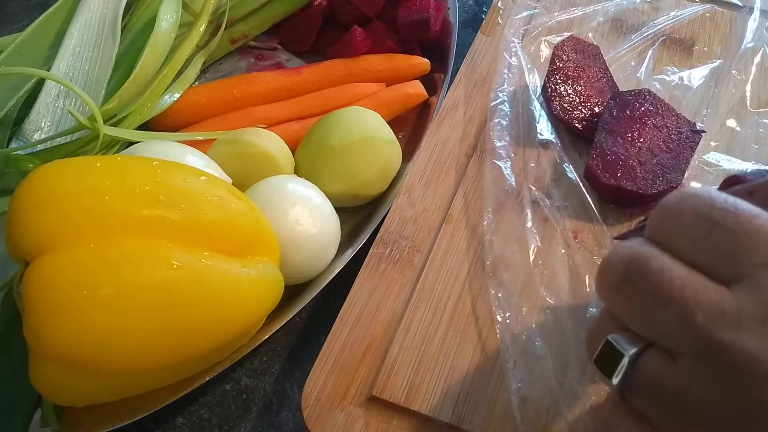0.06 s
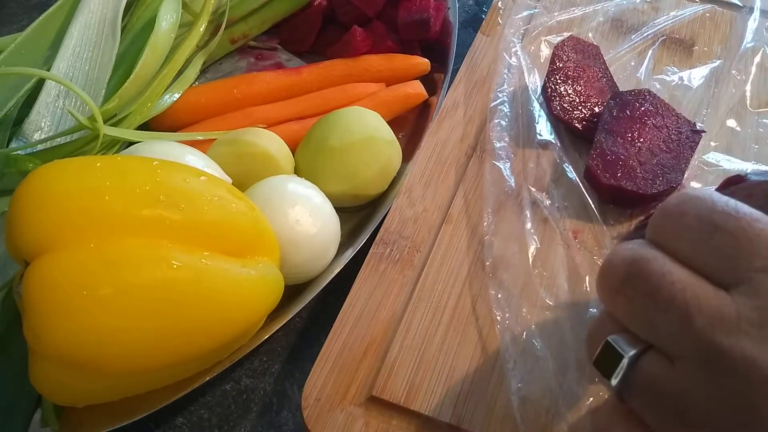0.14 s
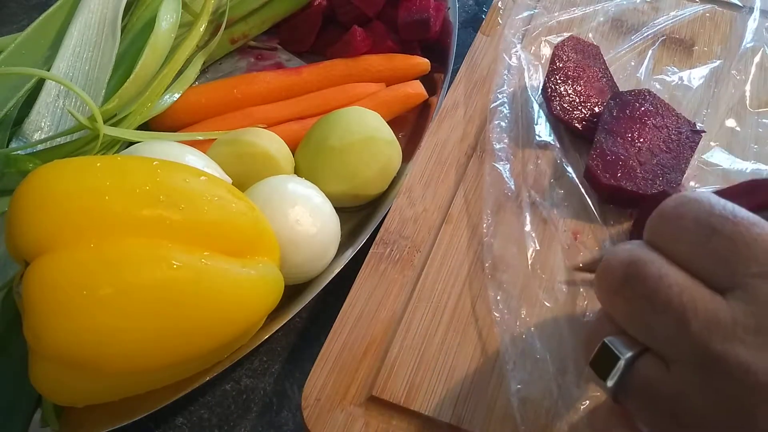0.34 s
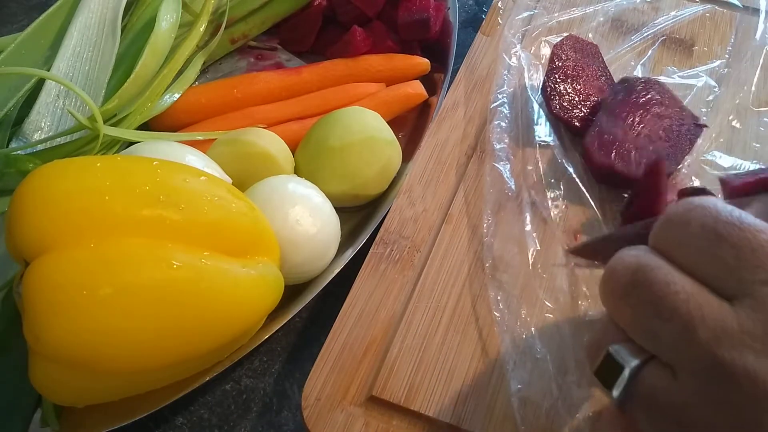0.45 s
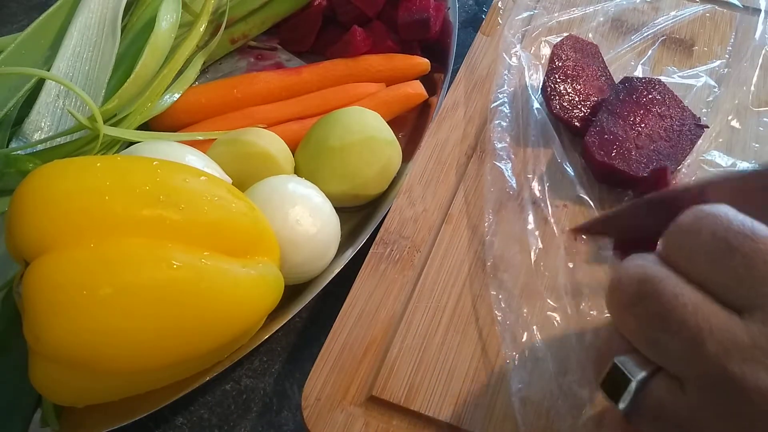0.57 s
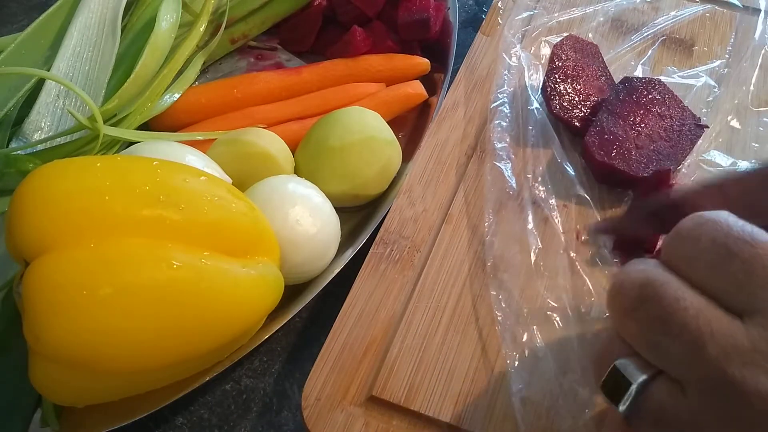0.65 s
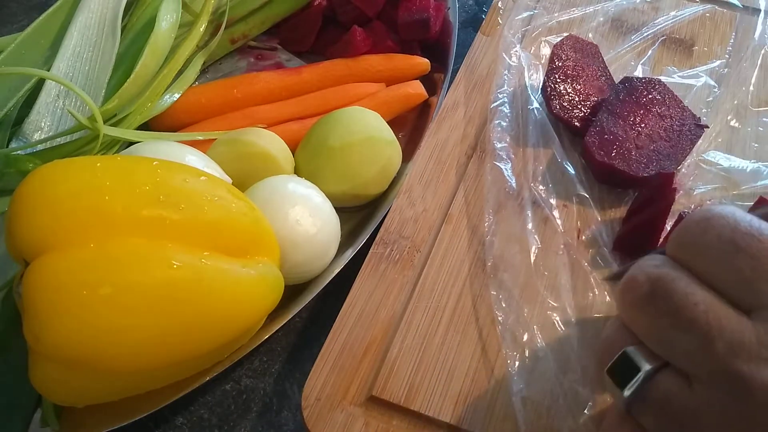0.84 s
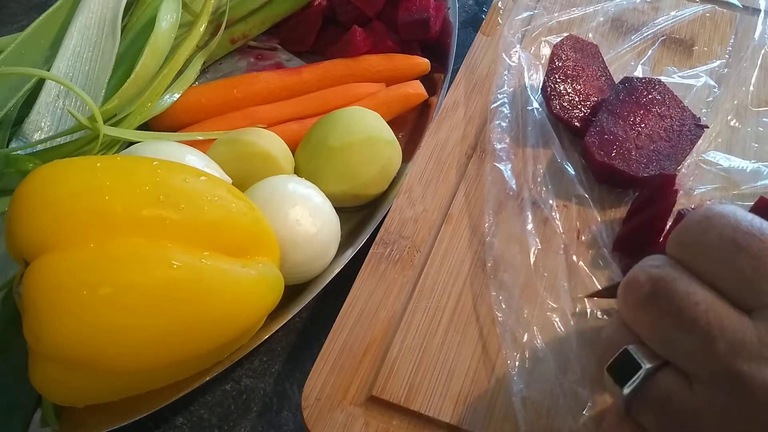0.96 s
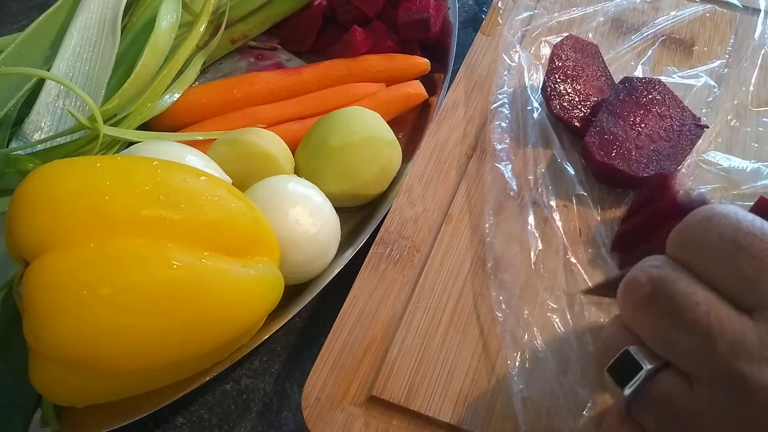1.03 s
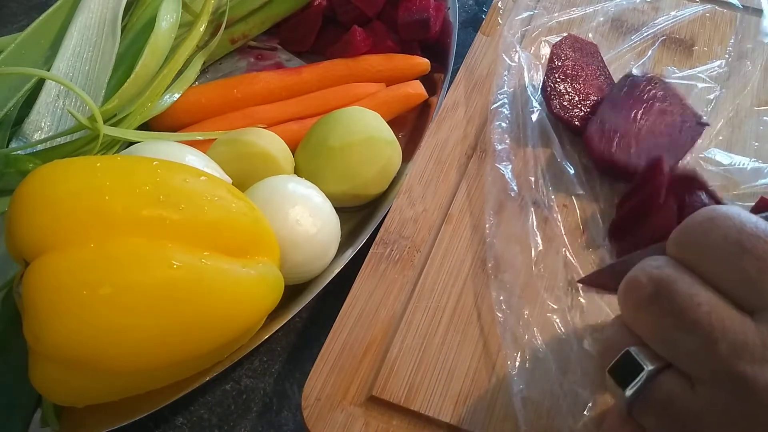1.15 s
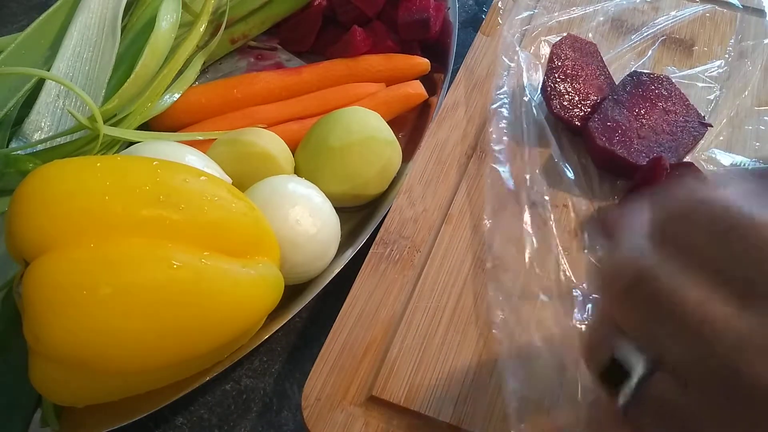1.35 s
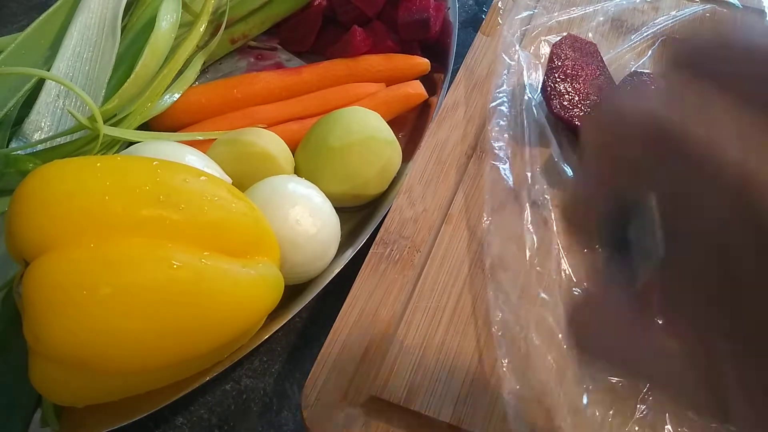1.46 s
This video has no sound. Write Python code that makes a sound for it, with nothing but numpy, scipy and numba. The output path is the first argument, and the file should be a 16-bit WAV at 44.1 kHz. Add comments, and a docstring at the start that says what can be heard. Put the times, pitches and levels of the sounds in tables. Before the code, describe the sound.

Close stereo pickup in a small kitchen: plastic film creases faintly, a blade squeaks and crunches through firm beetroot and raps the wooden board, pauses, then slices quietly and knocks again, with light rustles afterwards.

```python
"""Faint room air, creasing plastic film and soft rubs open the scene, then a kitchen knife cuts twice
through raw beetroot on a film-covered wooden board. The blade sticks, slips and creaks (decaying tones),
the flesh tears in crackling jerks (filtered random grains), and the blade knocks on the wood (force pulses
into ringing modes). The film rustles (grains), the hand nudges the board (resonant noise), and a small
kitchen rings briefly (convolution with decaying noise)."""
import sys
import numpy as np
from scipy import signal
from scipy.fft import rfft, irfft
from scipy.io import wavfile
from scipy.ndimage import uniform_filter1d
from numba import njit

SR = 44100
rng = np.random.default_rng(int(sys.argv[2]) if len(sys.argv) > 2 else 0)


def wrap_up_sound(samples):
    """Save the sound to the file named by the first command line argument, as 16-bit audio."""
    columns = np.atleast_2d(samples).T
    # keep every value between -1 and 1, then stretch to whole-number steps
    tamed = np.clip(columns, -1, 1)
    steps = np.round(tamed * 32767).astype(np.int16)
    wavfile.write(sys.argv[1], SR, steps)


N = 66150


def undb(db):
    """Amplitude ratio of a level in decibels."""
    return 10 ** (np.asarray(db) / 20)


def seconds():
    """Time axis [s]."""
    return np.arange(N) / SR


def unit(x):
    """Normalization to an rms of 1."""
    return x / np.sqrt(np.mean(x ** 2))


def ring(x, response):
    """Linear system: excitation convolved with impulse response."""
    return signal.fftconvolve(x, response)[:N]


def colour(points):
    """Minimum-phase impulse response of a spectrum (frequency [Hz], level [dB]), by folding the cepstrum."""
    hz, db = np.array(points, float).T
    size = 8192
    bins = np.fft.rfftfreq(size, 1 / SR)
    gain = undb(np.interp(np.log(bins + 1), np.log(hz), db))
    cepstrum = irfft(np.log(gain))
    cepstrum[1:size // 2] *= 2
    cepstrum[size // 2 + 1:] = 0
    return irfft(np.exp(rfft(cepstrum)))


def through(x, response):
    """Filtering with a response of unit energy, which keeps the power of a white input."""
    return ring(x, response / np.sqrt(np.sum(response ** 2)))


def resonance(hz, width):
    """Damped oscillator: the bandwidth [Hz] sets the exponential decay of its impulse response."""
    t = seconds()
    return np.exp(-np.pi * width * t) * np.sin(2 * np.pi * hz * t)


def grains(rate, spread_db):
    """Shot noise: random snaps of either sign at a mean rate [1/s], rms 1; zero spread makes them equal."""
    size = undb(spread_db * np.minimum(rng.exponential(size=N), 4))
    happens = rng.random(N) < rate / SR
    return unit(happens * size * rng.choice([-1, 1], N))


def burst(start, length):
    """Transient envelope: linear attack, hold, exponential release."""
    attack_s, release_s = 0.00025, 0.0031
    age = seconds() - start
    attack = np.clip(age / attack_s, 0, 1)
    return attack * np.exp(-np.maximum(age - length, 0) / release_s)


def widen(mid, side):
    """Mid-side stereo: sum on the left, difference on the right."""
    return np.array([mid + side, mid - side])


def crackle(envelope, spectrum, rate, spread_db):
    """Filtered shot noise, with independent treble in the side signal for partial decorrelation."""
    treble_side = 0.37
    response = colour(spectrum)
    mid, side = (through(envelope * grains(rate, spread_db), response) for _ in range(2))
    treble = signal.butter(2, 3500, "high", fs=SR, output="sos")
    return widen(mid, treble_side * signal.sosfilt(treble, side))


def air():
    """Stationary coloured noise: the low noise of the room, partly different left and right."""
    # spectrum of the quiet room: (frequency [Hz], level [dB])
    air_spectrum = [(25, -14), (80, 9), (170, -8.5), (300, 2.5), (520, 3.5), (1000, -3), (1900, -13),
                    (14000, -32)]
    level_db, side_share = -63.5, 0.2
    mid, side = (through(rng.standard_normal(N), colour(air_spectrum)) for _ in range(2))
    return undb(level_db) * widen(mid, side_share * side)


def film():
    """Shot noise of buckling plastic: the film creases all the time and rustles when the hand shifts."""
    # creasing under the hand: (time [s], level [dB])
    creasing = [(0, -59.5), (0.498, -56), (.65, -57), (.8, -56.5), (1.23, -60.5), (1.302, -61),
                (1.419, -57.5), (1.5, -68)]
    # rustles: (time [s], length [s], level [dB])
    rustles = [(0.03, 0.017, -57.5), (0.08, 0.0038, -58.5), (0.176, 0.0008, -43.5), (0.623, 0.0029, -58),
               (0.776, 0.0058, -49), (0.781, 0.021, -57), (1.2, 0.03, -55.5), (1.359, 0.015, -49.5),
               (1.376, 0.012, -47.5)]
    # spectrum of the film: (frequency [Hz], level [dB])
    film_spectrum = [(300, 0), (1500, -10.5), (3500, -4), (4600, -11.5), (5700, 1.5), (6700, -3), (7900, 5),
                     (10000, -2.5), (14000, -11.5)]
    snaps_per_s, spread_db = 1400, 1.5
    envelope = undb(np.interp(seconds(), *np.array(creasing).T))
    for start, length, db in rustles:
        envelope = envelope + undb(db) * burst(start, length)
    return crackle(envelope, film_spectrum, snaps_per_s, spread_db)


def nudges():
    """Noise-driven damped resonances: small bumps, rubs and ticks on the board."""
    # hand, blade and beetroot on the board:
    # (time [s], length [s], level [dB], centre frequency [Hz], bandwidth [Hz])
    contacts = [(0, 0.26, -54, 756, 880), (0.082, 0.005, -41.5, 744, 1490), (0.082, 0.04, -45, 87, 40.4),
                (0.111, 0.085, -55.5, 93, 50), (0.34, 0.0029, -22, 266, 420),
                (0.526, 0.002, -49, 4300, 2700), (1.433, 0.0076, -50.5, 492, 172.4)]
    total = np.zeros(N)
    for start, length, db, hz, width in contacts:
        rub = burst(start, length) * rng.standard_normal(N)
        total += undb(db) * through(rub, resonance(hz, width))
    return total


def board():
    """Modal synthesis: the board's impulse response is a sum of decaying cosines."""
    # modes of the board with the blade on it: (frequency [Hz], level [dB], 60 dB decay time [s])
    modes = [(111, -42.5, 0.082), (318.7, -15, 0.027), (544, -8, 0.033), (670, -12.5, 0.045),
             (788, -9.5, 0.047), (881, 3.5, 0.013), (980, -0.5, 0.017), (1165, 7.5, 0.018),
             (1252, -4.5, 0.044), (1428, -5.5, 0.024), (1655, 4, 0.013), (1797, 9, 0.012),
             (1860, 0.5, 0.0047), (2765, -2, 0.041), (3259, -1.5, 0.031), (3680, 0.5, 0.024)]
    t = seconds()
    return sum(undb(db - 60 * t / t60) * np.cos(2 * np.pi * hz * t) for hz, db, t60 in modes)


def knocks(wood):
    """Impact excitation: the blade breaks through, hits the board and rebounds once."""
    # landings of the blade: (time [s], relative level [dB], contact time scale [s])
    landings = [(.3470, -5, 0.00029), (1.0990, -4, 0.00027)]
    common_db = -2
    rebound_s, rebound_db = 0.002527, -17.5
    force = np.zeros(N)
    for start, db, contact in landings:
        for delay, drop in ((0, 0), (rebound_s, rebound_db)):
            age = np.maximum(seconds() - start - delay, 0) / contact
            push = age * np.exp(-4 * age)
            force += undb(common_db + db + drop) * push / push.sum()  # level sets the impulse
    return ring(force, wood)


def slips():
    """Stick-slip friction: each slip is a short creak of a few cycles that sets two tones of the blade in the
    flesh humming."""
    # slips of the blade in the flesh: (time [s], level [dB], pitch [Hz])
    creaks = [(.1893, -22, 720), (.1985, -24, 720), (.2222, -24.5, 713), (.2402, -17, 740),
              (.2465, -17.5, 778), (.2725, -19.5, 765), (.2775, -23.5, 802), (.850, -39.5, 775),
              (.859, -39.5, 800), (.876, -33, 723), (.903, -31.5, 720), (.9245, -28, 830),
              (.9445, -26, 725), (.9655, -24.5, 740), (.972, -23.5, 785), (.990, -28.5, 806),
              (1.002, -32, 820)]
    # tones that the slips set humming: (frequency [Hz], bandwidth [Hz], level [dB])
    tones = [(668, 19, 4.5), (789.6, 6.7, 5)]
    rise_s = 0.0018
    creak = np.zeros(N)
    for start, db, hz in creaks:
        age = np.maximum(seconds() - start, 0)
        envelope = age / rise_s * np.exp(1 - age / rise_s)
        creak += undb(db) * envelope * np.sin(2 * np.pi * hz * age)
    total = creak.copy()
    for hz, width, db in tones:
        peak_norm = 2 * np.pi * width / SR  # about unit gain at resonance
        total += undb(db) * ring(creak, resonance(hz, width)) * peak_norm
    return total


def cutting(wood):
    """Fracture noise: cells burst under the edge, strongest in the jerks, and shake board and worktop."""
    # steady push of each cut: (start [s], end [s], board level at start [dB], board level at end [dB],
    # crackle level [dB]); board levels are relative
    cuts = [(0.198, 0.35, -37, -32.5, -44.5), (0.892, 1.074, -41, -43.5, -50)]
    # jerks in which the flesh tears: (time [s], length [s], relative board level [dB], crackle level [dB])
    tears = [(0.1897, 0.0019, -30.5, -36.5), (0.1954, 0.0048, -28, -34.5), (0.2225, 0.0072, -28.5, -35),
             (0.2392, 0.012, -29, -32), (0.2605, 0.001, -40, -31), (0.266, 0.013, -31, -34.5),
             (0.29, 0.024, -34, -38), (0.322, 0.022, -32, -30.5), (0.3361, 0.012, -25, -25.5),
             (0.873, 0.01, -44.5, -51.5), (0.894, 0.0098, -43, -44.5), (0.922, 0.0029, -41, -41),
             (0.94, 0.013, -37, -41.5), (0.961, 0.015, -35.5, -40.5), (0.986, 0.024, -34.5, -45.5),
             (1.0497, 0.0082, -30, -31.5), (1.065, 0.0049, -34.5, -32), (1.077, 0.034, -39, -40)]
    # force passed on by the flesh, bursting cells, worktop rumble: (frequency [Hz], level [dB])
    push_spectrum = [(40, -6), (100, 18.5), (200, -2), (320, 9.5), (700, 0), (1150, -8.5), (1900, -12.5),
                     (3500, -14), (6000, -23.5)]
    cell_spectrum = [(300, -9.5), (1500, -18.5), (2800, -4.5), (3600, 4.5), (4600, -16), (5100, -1),
                     (6800, 2), (7900, 7.5), (10000, -1), (14000, -12.5)]
    rumble_spectrum = [(25, -14.5), (85, 2), (300, -8), (700, -19), (3000, -59.5)]
    cells_per_s, force_spread_db, cell_spread_db = 2800, 3.5, 0
    shake_db, rumble_db = -0.5, -13.5

    # independent sources add in power
    shake_power, snap_power = np.zeros(N), np.zeros(N)
    for start, end, first_db, last_db, crackle_db in cuts:
        gate = burst(start, end - start)
        board_db = np.interp(seconds(), [start, end], [first_db, last_db])
        shake_power += (gate * undb(board_db)) ** 2
        snap_power += (gate * undb(crackle_db)) ** 2
    for start, length, board_db, crackle_db in tears:
        gate = burst(start, length)
        shake_power += (gate * undb(board_db)) ** 2
        snap_power += (gate * undb(crackle_db)) ** 2

    def force():
        """Shot-noise force, drawn afresh at each call."""
        return np.sqrt(shake_power) * grains(cells_per_s, force_spread_db)

    body = undb(shake_db) * through(force(), ring(wood, colour(push_spectrum)))
    # the worktop rumbles independently at the two microphones
    rumble = undb(rumble_db) * np.array([through(force(), colour(rumble_spectrum)) for _ in range(2)])
    snaps = crackle(np.sqrt(snap_power), cell_spectrum, cells_per_s, cell_spread_db)
    return body + rumble + snaps


def kitchen(dry):
    """Diffuse reverberation: convolution with decaying noise, nearly the same left and right."""
    # spectrum of the kitchen's echo: (frequency [Hz], level [dB])
    echo_spectrum = [(80, -29), (300, -8), (550, -18), (1150, -20.5), (1700, -12), (2450, -13.5),
                     (2800, -13), (3100, -7), (3600, -13.5), (4600, -20.5), (8000, -19), (14000, -26.5)]
    t60_s, build_s, side_share = 0.31, 0.0048, 0.028
    t = seconds()
    fade = undb(-60 * t / t60_s) * (1 - np.exp(-(t / build_s) ** 2))

    def diffuse():
        """Coloured noise tail of unit energy before colouring."""
        return ring(unit(fade * rng.standard_normal(N)) / np.sqrt(N), colour(echo_spectrum))

    mid, side = diffuse(), diffuse()
    tails = widen(mid, side_share * side)
    return dry + np.array([ring(x, tail) for x, tail in zip(dry, tails)])


def scene():
    """Superposition: the sources on the board share the kitchen's echo, and the room air is added."""
    wood = board()
    sources = film() + nudges() + knocks(wood) + slips() + cutting(wood)
    return air() + kitchen(sources)


@njit
def follow(x, release):
    """Peak detection: the level jumps up at once and decays exponentially."""
    out, level = np.empty(len(x)), 0.
    for i in range(len(x)):
        level = max(x[i], level * release)
        out[i] = level
    return out


def record(dry):
    """Microphone response with an upper-mid notch, gain reduction on peaks, soft saturation, low-pass."""
    # response of the microphone: (frequency [Hz], level [dB])
    mic_response = [(20, -26), (70, -7), (200, 1), (2020, 1.5), (2200, -20), (2330, -16.5), (2650, 6),
                    (2800, 2), (15000, -6)]
    limit_db, release_s, top_hz = 7.5, 0.037, 14300
    heard = np.array([ring(x, colour(mic_response)) for x in dry])
    peak = follow(np.abs(heard).max(axis=0), np.exp(-1 / (release_s * SR)))
    excess = np.maximum(peak / undb(limit_db), 1)
    gain = uniform_filter1d(1 / np.sqrt(excess), size=64)  # square root: 2:1 compression
    low_pass = signal.ellip(10, .2, 70, top_hz, fs=SR, output="sos")
    return signal.sosfilt(low_pass, np.tanh(heard * gain))


dry = scene()
out = record(dry)
wrap_up_sound(out)
```